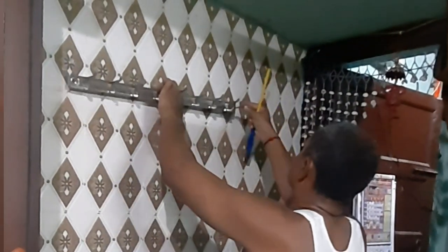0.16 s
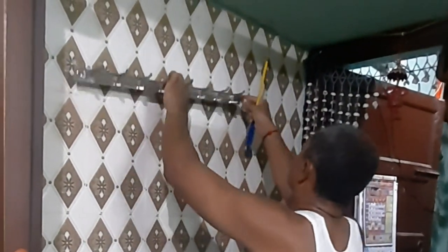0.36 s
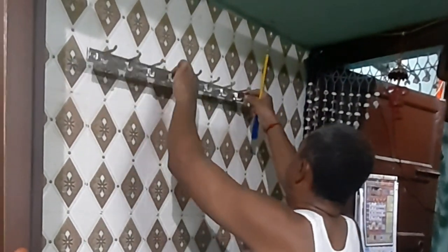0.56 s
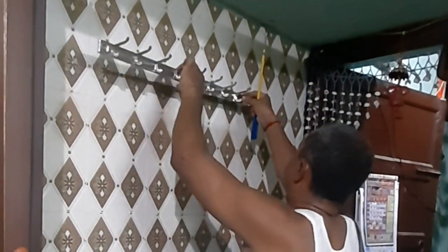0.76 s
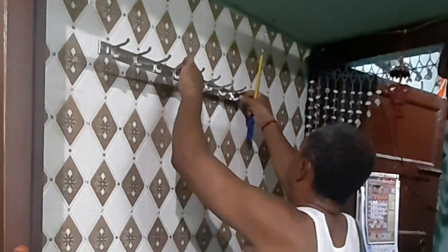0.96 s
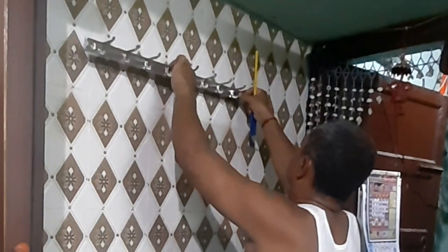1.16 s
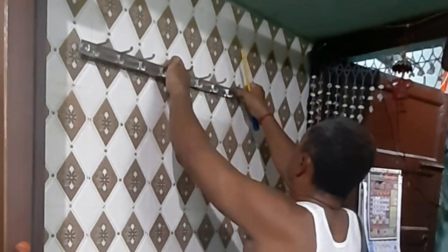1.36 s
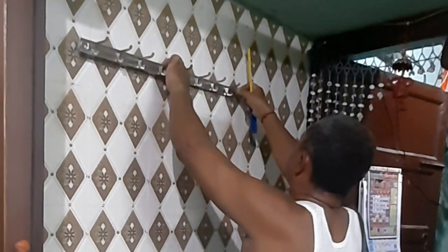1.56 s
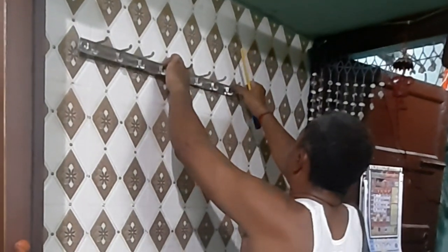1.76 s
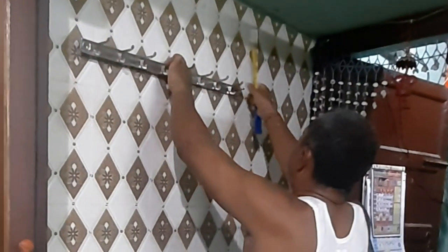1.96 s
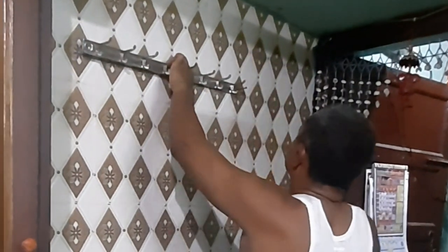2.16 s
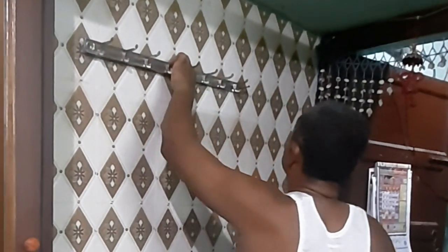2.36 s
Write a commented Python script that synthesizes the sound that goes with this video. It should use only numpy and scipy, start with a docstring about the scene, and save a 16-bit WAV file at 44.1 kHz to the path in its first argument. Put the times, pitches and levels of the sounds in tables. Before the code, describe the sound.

A steel rail scrapes and clatters against a tiled wall, a fan humming softly behind.

```python
"""A steel hook rail, held against a tiled wall in a small hard room, ticks, scrapes upward with a bright
ring, and a second later skids and clatters flat on the tiles. Contact pulses and stick-slip clicks
drive its clear modes and a short dense clash of hooks and tile. Hand and arm bump dully.
Behind it something like a ceiling fan turns five times a second, its hum and air noise swelling each
turn. Soft treble swishes come and go, most in time with the turns."""
import sys
import numpy as np
from scipy import signal
from scipy.fft import rfft, irfft
from scipy.io import wavfile
from scipy.ndimage import uniform_filter1d

SR = 44100
rng = np.random.default_rng(int(sys.argv[2]) if len(sys.argv) > 2 else 0)


def transcribe(u):
    """Save the signal u as a 16-bit wav file named by the first command-line argument.

    u: samples, shape (n,) or (channels, n), limited to [-1, 1]; the rate is SR.
    q: integer samples, one column per channel.
    """
    v = np.clip(np.atleast_2d(u).T, -1, 1)
    q = np.round(v * 32767).astype(np.int16)
    wavfile.write(sys.argv[1], SR, q)


N = 110250

# rail modes (frequency [Hz], scraped gain [dB], knocked gain [dB])
RAIL_MODES = [(2256, -13, -12), (2371, -14, -26), (2563, -25, -2.5), (2915, -17, 0), (3768, -36, -2),
              (3986, -22, 1), (4075, -10, -11), (4242, -17, -7), (4629, -32, -9), (4785, -12, -5),
              (5017, -10, -7), (5189, -15, -6), (5535, -7, -10), (6050, -8, -8), (6481, -15, -18),
              (7112, -7, -9), (7358, -18, -7), (7435, -5, -10), (7530, -1, -10), (7574, -4, -8),
              (7990, -7, 1), (8560, -13, -14), (10455, -11, -15), (10745, -22, -7), (11560, -11, -7)]
# clash of hooks and tile (frequency [Hz], scraped gain [dB], knocked gain [dB])
CLASH_SPECTRUM = [(200, -32, -19.5), (804, -27.5, -4), (1120, -27, -10.5), (1610, -24.5, -6),
                  (2405, 5.5, -15), (3060, -27, 4.5), (3460, -9, -2), (4050, -10, 4.5), (5500, 5.5, 2.5),
                  (6620, -4.5, -5), (7800, 7, 7), (9200, -6, -4), (11500, 0.5, -3.5), (15700, -10, -10.5)]
SCRAPED, KNOCKED = 1, 2  # columns


def rail(drive, ring_db, column, spots=3, dwell_s=0.009):
    """Contacts excite clear modes and a dense clash that changes as the contact spot wanders."""
    t = np.arange(SR // 10) / SR
    envelope = decay(t, t60_s=0.038) + amp(-10) * decay(t, t60_s=0.018)  # clash + crack
    spot = np.arange(N) / SR // dwell_s % spots
    clash = sum(convolve(drive * (spot == k), flat_burst(envelope)) for k in range(spots))
    body = amp(1.5) * convolve(clash, min_phase(lookup(CLASH_SPECTRUM, bins(), column)))
    drive_spectrum = np.sqrt(abs(uniform_filter1d(abs(rfft(drive)) ** 2, size=2000)) / N)
    for mode in RAIL_MODES:
        hz = mode[0]
        t60_s = 0.11 * (3000 / hz) ** 0.48
        pole = decay(1 / SR, t60_s) * np.exp(2j * np.pi * hz / SR)
        phases = rng.uniform(-np.pi / 2, np.pi / 2, (2, 1))
        ring = signal.lfilter([1], [1, -pole], drive + 1e-18) * np.exp(1j * phases)
        body += amp(ring_db + mode[column]) * drive_spectrum[round(hz * N / SR)] * unit(ring.real)
    return body


def stick_slip(force_db, slips_per_s=2200, spread_db=3.5):
    """Steel grips and lets go: dense, uneven clicks that follow the force."""
    clicks = (rng.random(N) < slips_per_s / SR) * rng.choice([-1, 1], N)
    sizes = amp(spread_db * np.minimum(rng.exponential(1, N), 3))
    return unit(clicks * sizes) * amp(force_db - 16.5)


# upward scrape (time [s], force [dB])
SCRAPE_FORCE = [(.364, -74), (.372, -24.5), (.382, -22), (.402, -12), (.447, -12.5), (.456, -22.5),
                (.51, -42), (.60, -58)]
# catches of the rail's end (time [s], strength [dB], treble tilt [dB/octave])
SCRAPE_CATCHES = [(0.3961, -7.5, 5), (0.4009, -8, 2), (0.4062, -12, -4.5), (0.4165, -11.5, -5),
                  (0.4219, -11, 0.5), (0.4363, -6.5, 0.5), (0.4433, -8, -2), (0.4736, -18, -3)]


def scrape():
    """The rail's end slides over the glaze and catches."""
    drive = stick_slip(force_curve(SCRAPE_FORCE)) + impacts(SCRAPE_CATCHES)
    return rail(drive, ring_db=-7, column=SCRAPED)


# skid around the clatter (time [s], force [dB])
SKID_FORCE = [(1.232, -51), (1.258, -26.5), (1.276, -22.5), (1.294, -19.5), (1.32, -23.5), (1.368, -29),
              (1.39, -50), (1.44, -70)]
# flat of the rail on tile (time [s], strength [dB], treble tilt [dB/octave])
FLAT_KNOCKS = [(1.3154, -8.5, -5.5), (1.3182, 0.5, 2.5), (1.3234, -4, -3), (1.328, -4, -3.5),
               (1.3462, -1.5, 4), (1.352, -6.5, -0.5), (1.362, -14, -10.5), (1.369, -6, -1.5)]


def clatter():
    """The rail skids, rasping the tile, then knocks flat against it."""
    skid = convolve(stick_slip(force_curve(SKID_FORCE)), tilted_pulse(db_per_octave=-6))[0]
    rasp = amp(-7.5) * convolve(skid, band_pulse(hz=1220, octaves=0.91))
    skid_ring = rail(skid, ring_db=-9, column=SCRAPED)
    knocks = rail(impacts(FLAT_KNOCKS), ring_db=-12.5, column=KNOCKED)
    return rasp + skid_ring + knocks


# rail corner on tile (time [s], strength [dB])
CORNER_TAPS = [(0.2363, -5), (0.3015, -16.5), (0.793, -26)]


def taps():
    """A corner ticks on the glaze and sets the rail ringing faintly."""
    drive = np.zeros(N)
    for at_s, db in CORNER_TAPS:
        add(drive, at_s, amp(db) * band_pulse(hz=5560, octaves=0.43))
    tick = convolve(drive, flat_burst(decay(np.arange(SR // 10) / SR, t60_s=0.013)))
    return tick + amp(0.5) * rail(drive, ring_db=-16, column=SCRAPED)


# brushes of the rail's end (centre [s], sigma [s], force [dB], width [octaves])
END_BRUSHES = [(0.367, 0.0022, -22, 0.37), (0.539, 0.011, -21, 0.9), (0.67, 0.0073, -27, 0.31)]


def brushes(hz=7600):
    """Light sliding contacts leave the rail free to ring."""
    drive = np.zeros(N)
    for centre_s, sigma_s, db, octaves in END_BRUSHES:
        slips = stick_slip(db) * swell(centre_s, sigma_s)
        drive += convolve(slips, band_pulse(hz, octaves))[0]
    return rail(drive, ring_db=-5.5, column=SCRAPED)


# room decay (frequency [Hz], T60 [s])
ROOM_DECAY = [(250, 0.6), (2500, 0.23), (7500, 0.16), (15000, 0.23)]


def room(sound, delay_s=0.0012):
    """Tiled walls return a short tail; the bass lasts longest."""
    reflections = rng.standard_normal((2, SR // 2)) * (np.arange(SR // 2) > delay_s * SR)
    hz, t, spectra = signal.stft(reflections, SR, nperseg=256)
    tail = signal.istft(spectra * decay(t, lookup(ROOM_DECAY, hz)[:, None]), SR, nperseg=256)[1]
    return convolve(sound, tail / np.linalg.norm(tail[0]))


# hand and arm bumps (time [s], frequency [Hz], level [dB])
HAND_BUMPS = [(0.144, 243, -38), (0.457, 68, -43), (1.414, 310, -41)]


def bumps(rise_s=0.0064):
    """Hand and arm make dull thuds that die within a few cycles."""
    t, thuds = np.arange(SR // 4) / SR, np.zeros(N)
    envelope = t / rise_s * np.exp(1 - t / rise_s)
    for at_s, hz, db in HAND_BUMPS:
        add(thuds, at_s, amp(db) * envelope * np.sin(2 * np.pi * hz * t))
    return thuds * background_pan(130)


# soft swishes (centre [s], sigma [s], level [dB])
TREBLE_SWISHES = [(0.059, 0.036, -57), (0.245, 0.025, -45.5), (0.624, 0.091, -55.5), (0.98, 0.017, -56),
                  (1.184, 0.016, -52), (1.785, 0.01, -60), (1.998, 0.017, -52), (2.104, 0.049, -58),
                  (2.384, 0.021, -61.5), (2.447, 0.013, -58)]
# swish colour (frequency [Hz], gain [dB])
SWISH_SPECTRUM = [(300, -27), (2000, 14), (3500, 4), (7500, 10.5), (9800, -10), (13000, 3.5), (16000, -5.5)]


def swishes():
    """Soft swells of treble noise, most in time with the fan's turns."""
    level = sum(amp(db) * swell(centre_s, sigma_s) for centre_s, sigma_s, db in TREBLE_SWISHES)
    hiss = convolve(rng.standard_normal((2, N)), min_phase(lookup(SWISH_SPECTRUM, bins())))
    return level * unit(hiss)


# air noise (frequency [Hz], relative density [dB])
AIR_SPECTRUM = [(20, -66), (35, -16.5), (55, 6), (90, -6.5), (154, -11.5), (222, -4.5), (350, -3),
                (420, -9.5), (540, -14.5), (730, -13.5), (920, -6), (1100, -18.5), (1500, -19.5),
                (2100, -15.5), (2900, -35.5), (4400, -37), (6000, -32.5), (7200, -26.5), (8300, -36),
                (9400, -46), (16000, -55.5)]
# air noise swing per turn (frequency [Hz], peak swing [dB])
AIR_SWING = [(80, .8), (300, 1.8), (800, 3.8), (2000, 3.5), (4500, 3), (7000, 1.2), (13000, 2)]
# air noise between channels (frequency [Hz], coherence [0..1])
AIR_COHERENCE = [(60, 1), (250, 0.88), (500, 0.72), (1500, 0.33), (8000, 0.41)]


def fan_air(level_db=-47.5, gust_db=1.2, gust_s=0.08, hop=256):
    """Blades stir air noise that swells once a turn and wavers in small gusts."""
    hz = bins()
    t = np.arange(N // hop + 5) * hop / SR
    noise = rng.standard_normal((len(t), len(hz), 4)).T
    left, independent = noise[0] + 1j * noise[1], noise[2] + 1j * noise[3]
    coherence = np.clip(lookup(AIR_COHERENCE, hz), 0, 1)[:, None]
    right = (coherence * left + np.sqrt(1 - coherence ** 2) * independent) * right_lag(hz)[:, None]
    gusts = uniform_filter1d(rng.standard_normal(left.shape), size=5, axis=0)
    gusts = unit(uniform_filter1d(gusts, size=round(gust_s * SR / hop), axis=1))
    swing_db = lookup(AIR_SWING, hz)[:, None] * fan_turn(t)
    gain = amp(lookup(AIR_SPECTRUM, hz)[:, None] + swing_db + gust_db * gusts)
    spectra = np.array([left, right]) * background_pan(hz) * gain
    return amp(level_db) * unit(signal.istft(spectra, nperseg=1024, noverlap=1024 - hop)[1][:, :N])


# fan resonances (frequency [Hz], half width [Hz], mid-swing level [dB])
HUM_RESONANCES = [(312.4, 9, -58.5), (378, 12, -56.5), (657, 21, -63.5), (853, 15.1, -65.5),
                  (904.7, 9.5, -59)]


def fan_hum(swing_db=3.4, steadiness=0.55):
    """Narrow noise-driven resonances swell once a turn."""
    hz, hum = bins(N), np.zeros((2, N))
    for centre_hz, width_hz, db in HUM_RESONANCES:
        band = rfft(rng.standard_normal(N)) / (1 + ((hz - centre_hz) / width_hz) ** 2)
        wave = signal.hilbert(irfft(band, N))
        steadied = rfft(wave.real / abs(wave) ** steadiness)
        pair = irfft(np.array([steadied, steadied * right_lag(hz)]), N)
        hum += amp(db) * unit(pair) * background_pan(centre_hz)
    return hum * amp(swing_db * fan_turn(np.arange(N) / SR))


def fan_turn(t, turns_per_s=5.12, peak_s=0.035):
    """Rotation cycle, +1 at its loudest."""
    return np.cos(2 * np.pi * turns_per_s * (t - peak_s))


def right_lag(hz, delay_s=0.00028):
    """Phase of the fan's later arrival on the right."""
    return np.exp(-2j * np.pi * hz * delay_s)


# balance of fan and bumps (frequency [Hz], left minus right [dB])
BACKGROUND_BALANCE = [(50, 7), (250, 2), (500, 6), (1200, 2.5), (7000, 7), (13000, -11.5)]


def background_pan(hz):
    """Left and right gains."""
    balance_db = lookup(BACKGROUND_BALANCE, hz)
    return amp(np.array([balance_db, -balance_db]) / 2)[..., None]


def impacts(hits):
    """One contact pulse per hit."""
    drive = np.zeros(N)
    for at_s, db, db_per_octave in hits:
        add(drive, at_s, amp(db) * tilted_pulse(db_per_octave))
    return drive


def tilted_pulse(db_per_octave):
    """Contact pulse, tilted above 2.8 kHz: harder is brighter."""
    return min_phase(db_per_octave * np.log2(np.maximum(bins(), 2800) / 6000))


def band_pulse(hz, octaves):
    """Contact pulse with its energy around one frequency."""
    offset = np.log2((bins() + 1) / hz) / octaves
    return min_phase(-20 * np.log10(1 + offset ** 2 / 2))


def flat_burst(envelope):
    """Stereo noise burst, whitened so no pitch stands out."""
    noise = rng.standard_normal((2, len(envelope))) * envelope
    power = uniform_filter1d(abs(rfft(noise)) ** 2, size=5)
    return convolve(noise, [min_phase(-10 * np.log10(side + 1e-9)) for side in power])


def force_curve(points):
    """Joins (s, dB) points; silent outside them."""
    return np.interp(np.arange(N) / SR, *np.transpose(points), left=-200, right=-200)


def swell(centre_s, sigma_s):
    """Gaussian hump in time."""
    return np.exp(-((np.arange(N) / SR - centre_s) / sigma_s) ** 2 / 2)


def decay(t, t60_s):
    """Exponential decay."""
    return np.exp(-np.log(1000) * t / t60_s)


def amp(db):
    """Decibels to gain."""
    return 10 ** (np.asarray(db) / 20)


def unit(x):
    """Scales to rms 1."""
    return x / np.sqrt(np.mean(x ** 2) + 1e-20)


def lookup(table, hz, column=1):
    """Interpolates a column over log frequency."""
    rows = np.array(table, float)
    return np.interp(np.log(hz + 1), np.log(rows[:, 0] + 1), rows[:, column])


def add(mix, at_s, sound):
    """Mixes a sound in at a time."""
    part = mix[max(round(at_s * SR), 0):][:len(sound)]
    part += sound[:len(part)]


def bins(size=1024):
    """FFT frequencies in Hz."""
    return np.fft.rfftfreq(size, 1 / SR)


def min_phase(db):
    """Minimum-phase response with these gains."""
    log_gain = np.log(amp(np.r_[db, db[-2:0:-1]]))
    return np.fft.ifft(np.exp(np.conj(signal.hilbert(log_gain)))).real


def convolve(x, response):
    """Convolves per channel, up to N samples."""
    return signal.fftconvolve(np.atleast_2d(x), np.atleast_2d(response), axes=1)[:, :N]


# balance of the rail (frequency [Hz], left minus right [dB])
RAIL_BALANCE = [(1000, 12), (2400, 3), (5500, 3.5), (7500, 16), (8700, 4), (10300, -9), (12000, -6),
                (15000, -2)]


def scene():
    """The rail, mostly left, with its room; swishes, bumps and fan behind."""
    metal = taps() + scrape() + brushes() + clatter()
    balance_db = lookup(RAIL_BALANCE, bins())
    metal = convolve(metal, [min_phase(balance_db / 2), min_phase(-balance_db / 2)])
    return metal + amp(-7.5) * room(metal) + swishes() + bumps() + fan_air() + fan_hum()


def record(dry):
    """Steep low-pass at the top of the treble."""
    lowpass = signal.firwin(511, cutoff=15820, window=("kaiser", 9), fs=SR)
    return signal.oaconvolve(dry, lowpass[None], "same")


dry = scene()
out = record(dry)
transcribe(out)
```